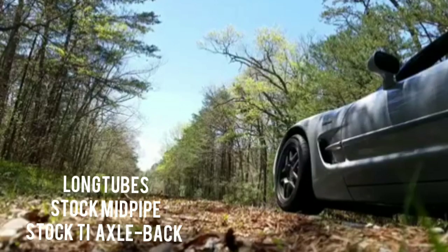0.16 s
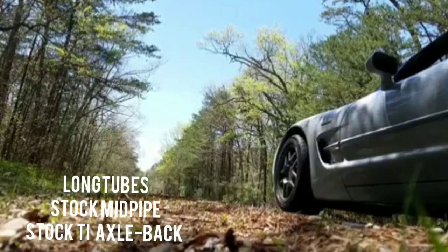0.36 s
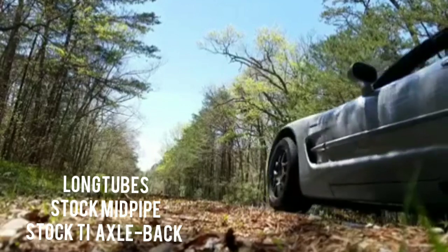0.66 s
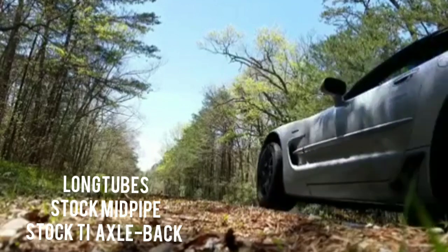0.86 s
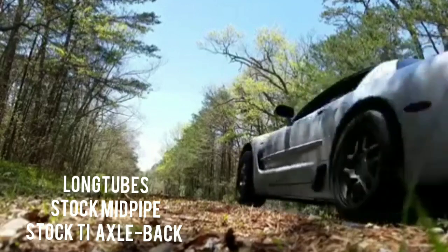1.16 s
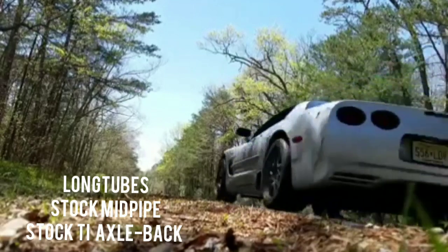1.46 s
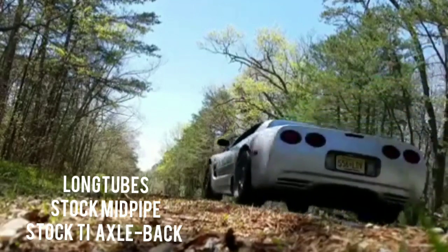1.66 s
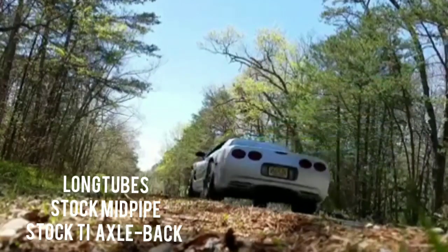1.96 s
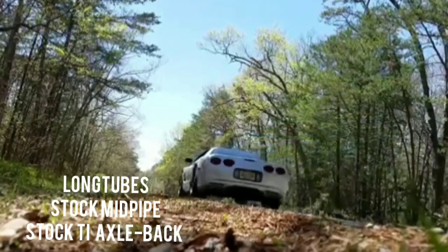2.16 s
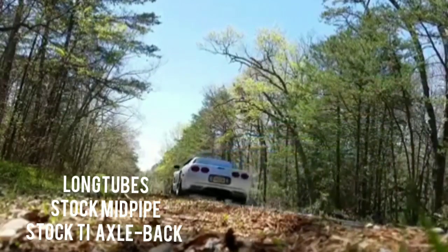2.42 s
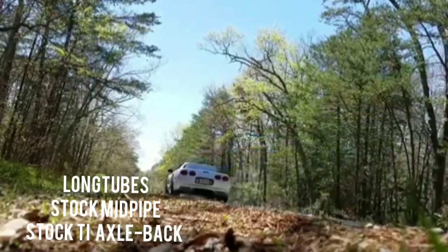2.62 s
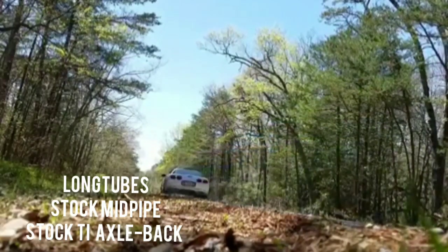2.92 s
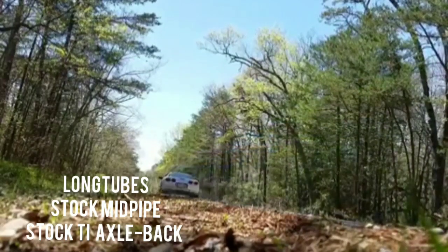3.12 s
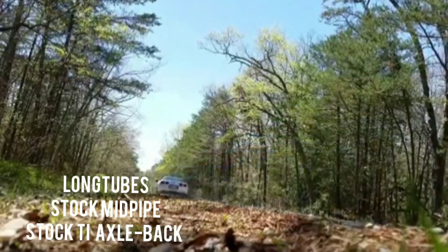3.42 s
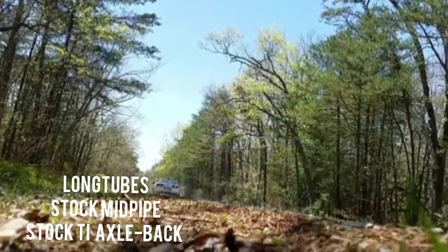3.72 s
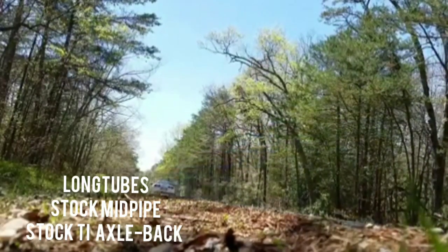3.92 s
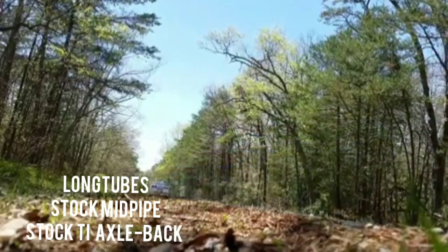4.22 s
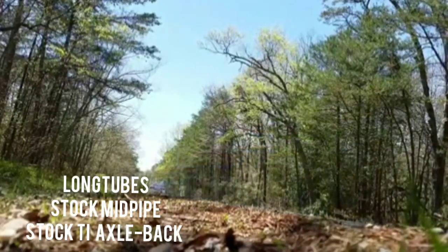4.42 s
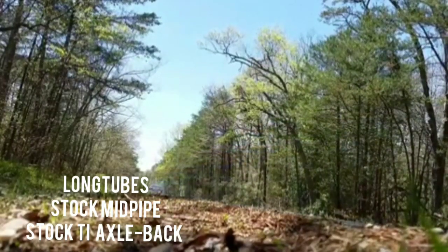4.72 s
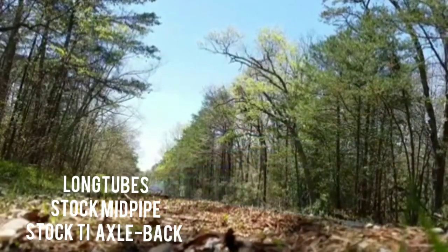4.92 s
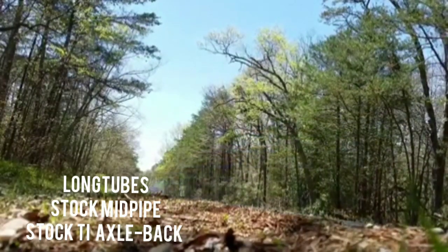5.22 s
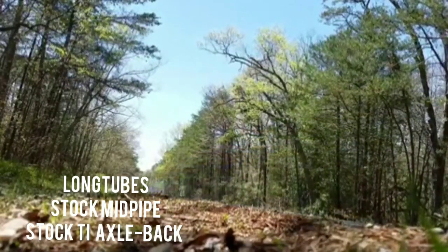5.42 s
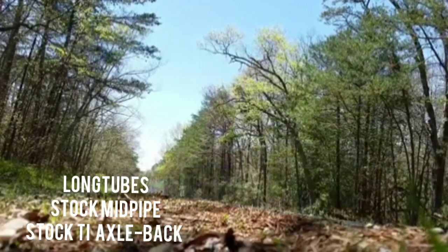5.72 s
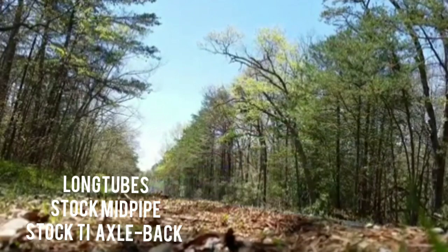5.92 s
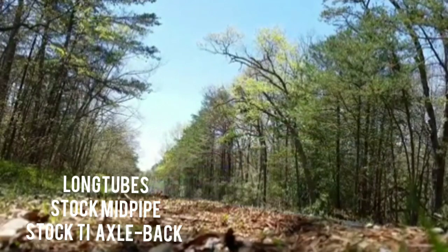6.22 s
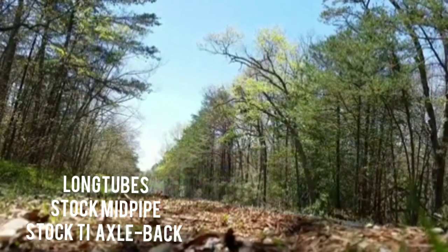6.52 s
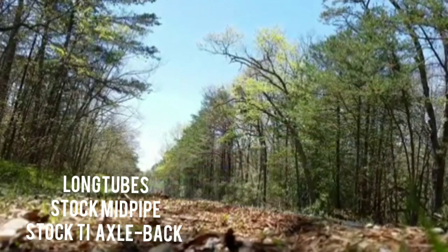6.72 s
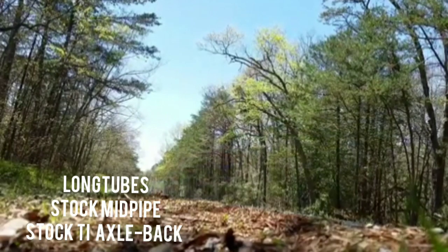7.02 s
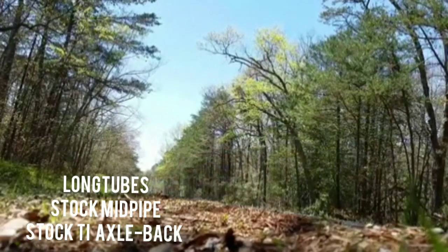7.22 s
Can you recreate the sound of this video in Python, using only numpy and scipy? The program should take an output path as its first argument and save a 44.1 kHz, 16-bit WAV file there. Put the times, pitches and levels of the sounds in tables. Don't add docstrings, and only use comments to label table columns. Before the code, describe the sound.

Outdoors in woodland, stereo microphone on the ground a stride from the car. The engine stutters and grunts off the line with gassy exhaust roar and rustling litter, rasps hard near two seconds, then revs steadily upward. Around four seconds it cuts, barks and chirps its tyres into second gear; past six seconds it shifts again and settles deeper. Band-limited, slightly coarse camera sound with limited peaks.

```python
import sys
import numpy as np
from scipy import signal
from scipy.fft import rfft, irfft, next_fast_len
from scipy.io import wavfile
from scipy.ndimage import uniform_filter1d, minimum_filter1d

SR = 44100
rng = np.random.default_rng(int(sys.argv[2]) if len(sys.argv) > 2 else 0)


def generate_wav(sig):
    pcm = np.round(np.clip(np.atleast_2d(sig).T, -1, 1) * 32767).astype(np.int16)
    wavfile.write(sys.argv[1], SR, pcm)


def ratio_of_db(decibels):
    return 10 ** (np.asarray(decibels, float) / 20)


N = 324727
TIME = np.arange(N) / SR


def unit(x):
    return x / np.sqrt(np.mean(x ** 2) + 1e-20)


def along(points, hz):
    f, v = np.transpose(points)
    return np.interp(np.log(hz + 1), np.log(f + 1), v)


def curves(rows):
    s, *columns = np.transpose(rows)
    return [np.interp(TIME, s, column) for column in columns]


def wobble(rate):
    knots = rng.standard_normal(700)
    return np.interp(TIME * min(rate, 90), np.arange(len(knots)), knots)


def bumps(s, db, length):
    return db * np.exp(-((TIME - s) / length) ** 2)


def peak(s, db, rise_db, fall_db):
    return db - np.where(TIME < s, rise_db * (s - TIME), fall_db * (TIME - s))


def filtered(x, response):
    m = next_fast_len(N + SR)
    return irfft(rfft(x, m) * response(np.fft.rfftfreq(m, 1 / SR)), m)[..., :N]


# (frequency [Hz], likeness [-1 to 1])
LIKENESS = [(60, 0.57), (140, 0.17), (320, 1), (760, 0.75), (1760, 0.52), (4100, -0.04), (9530, 0.34)]


def spread(pair, spectrum):
    def turn(hz):
        return np.arccos(np.clip(along(LIKENESS, hz), -1, 1)) / 2

    mid, side = filtered(pair, lambda hz: spectrum(hz) * [np.cos(turn(hz)), np.sin(turn(hz))])
    return unit(np.array([mid + side, mid - side]))


# (clutch opens [s], clutch bites [s], settling [s])
SHIFTS = [
    (4.095, 4.335, .03),
    (6.22, 6.456, .07),
]


def declutched(t):
    return sum(np.clip(np.minimum(t - out, bite - t) / 0.0095, 0, 1) for out, bite, settle in SHIFTS)


# (time [s], cycle rate [Hz])
GEARED_SPEED = [(0, 11.1), (.43, 15.2), (.8, 13.8), (1.15, 13.4), (1.38, 11.6), (1.56, 16.4), (1.76, 17.5),
                (1.97, 21.4), (2.9, 35.9), (3.4, 43.8), (4.09, 52.3), (4.33, 46.3), (5.07, 42.7), (5.5, 46),
                (6.22, 50.6), (6.46, 38.5), (6.77, 35.8), (7.36, 38.3)]


def revs():
    sag_hz_per_s = 12
    geared, = curves(GEARED_SPEED)
    for out, bite, settle in SHIFTS:
        free = np.interp(out, TIME, geared) - sag_hz_per_s * (np.minimum(TIME, bite) - out)
        hold = (TIME > out) * np.exp(-np.maximum(TIME - bite, 0) / settle)
        geared = geared + hold * (free - geared)
    return geared


# (start [s], end [s], rate [Hz], share of engine speed)
AXLE_HOP = (4.38, 4.95, 10.92, 0.017)


def crank():
    start, end, hop_hz, share = AXLE_HOP
    swing = np.clip((TIME - start) / 0.035, 0, 1) * np.clip((end - TIME) / (end - start), 0, 1) ** 0.6
    cycle_hz = revs() * (1 + share * swing * np.cos(2 * np.pi * hop_hz * (TIME - start) + 3.1))
    return cycle_hz, 2 * np.pi * np.cumsum(cycle_hz) / SR


# (time [s], firing tones [dB], other orders [dB], roar [dB])
ENGINE = [(0, -41.5, -31, -45), (.43, -31.5, -18, -34), (.82, -35.5, -23.5, -32), (1.19, -24, -23, -24),
          (1.39, -21.5, -16.5, -24), (1.56, -28, -18.5, -20), (1.8, -25, -18.5, -20.5),
          (2.0, -20, -11, -21.5), (2.5, -19, -13.5, -32.5), (2.93, -20, -20, -26.5),
          (3.69, -19.5, -13.5, -25.5), (4.09, -17, -16.5, -19.5), (4.33, -19.5, -13, -28.5),
          (5.06, -23.5, -13.5, -26), (5.7, -22, -14, -29), (6.22, -17, -15.5, -21.5),
          (6.6, -19, -15, -26.5), (7.36, -19.5, -14.5, -35.5)]
# (time [s], throttle [0-1])
THROTTLE = [(0, 1), (4.08, 0.63), (4.13, 0.34), (4.35, 0.05), (4.4, 0.85), (6.22, 0.6), (6.27, 0.1),
            (6.46, 0), (6.51, 0.82), (7.4, 0.9)]
# (time [s], scatter [rad per order])
ROUGHNESS = [(0, .008), (.3, .01), (.45, .025), (.75, .02), (1, .012), (1.48, .01), (1.58, .045),
             (2.15, .045), (2.35, .008), (7.4, .008)]
BARK_S = [
    4.14,
    4.37,
    6.29,
    6.5,
]
# (time [s], firing tones [dB], length [s], more on the third tone
# [dB])
FALTERS = [(0.192, 0.5, 0.057, 12.5), (0.305, 4.5, .06, 4.5), (0.546, -8, 0.14, -6), (1.167, 0, .09, -20),
           (1.493, 3.5, 0.047, -6), (1.557, -5, 0.044, 3), (2.01, -2, 0.059, -12), (4.15, 0, .03, -4),
           (6.293, -6.5, 0.026, -1.5), (6.511, -4, 0.021, -3)]
# (start [s], end [s])
LAST_GEAR_S = (6.46, 6.6)
# (start [s], end [s])
FAR_S = (4.1, 6.7)
FAR_DB = [-3, 7.5, 2.5]
DULL_HZ = (776, 1105)
# (frequency [Hz], level [dB])
STANDING_WAVES = [
    [(95, 1), (120, 2), (180, -2.5), (240, -10), (290, 3.5), (350, -7), (405, 4)],
    [(190, 0), (240, -1), (300, 5.5), (350, -6.5), (480, 1.5), (590, -2), (700, 0.5), (820, -6)],
    [(305, 3), (380, -14), (470, 7.5), (560, -6.5), (720, 6), (870, -4), (1000, -25), (1200, -29)],
]
# (order, level [dB])
BANK_THROB = [(2, 0), (3, 5.5), (4, -4), (5, -5.5), (6, 3)]
# (frequency [Hz], level [dB])
LOW_PIPE = [(50, -16.5), (100, -6.5), (150, -2.5), (190, 4), (230, -5.5), (300, 0.5)]
# (order, loaded at high revs [dB], low revs [dB], throttle shut [dB], last gear [dB])
UNEVEN_ORDERS = [(7, -12.5, -18.5, -18.5, -19.5), (9, -12, -20.5, 3, -16.5), (10, 3.5, -9, -4, -16),
                 (11, -2, -3, -11, -9), (12, -5.5, -8, 5, 0.5), (13, -6.5, -3.5, -3, -10.5),
                 (14, 7.5, -4, -6, -1.5), (15, -16, -14.5, 8, -14.5), (17, -9, -19.5, 0.5, -26),
                 (18, -4.5, -5.5, -7, -4.5), (19, -1, -6.5, -15, -2.5), (20, -9, 0.5, -7.5, 4),
                 (21, -14.5, -18.5, -19.5, -17.5), (22, 6.5, 3.5, -13.5, 1.5), (23, -6.5, -12, -1, -16),
                 (25, -2.5, -3, -0.5, -9.5), (26, -3.5, -21, -18, -18), (27, -7.5, 0.5, -8.5, -2.5),
                 (28, 4.5, -11.5, -7, -1), (29, -4, -11, -23.5, -3), (30, 3.5, 0, -2, -1),
                 (31, -8, 2, 0, -10.5), (32, -4.5, 2.5, -5, 3), (34, -7.5, -6.5, -21, -6.5),
                 (36, -1, 0.5, -5.5, -1.5), (38, -16, -4, -4, -4), (40, 1.5, -4, -12, -9),
                 (48, -11.5, -6.5, -6, -2.5)]
# (frequency [Hz], level [dB])
PIPE = [(80, -33), (150, -11.5), (300, -14.5), (400, -5), (520, -5.5), (650, 0), (730, -5.5), (820, 3),
        (950, -6), (1100, -13.5), (1300, -24.5), (1800, -25.5), (2500, -45.5)]


def exhaust(cycle_hz, angle):
    every = 64
    t, speed = TIME[::every], cycle_hz[::every]
    firing_db, other_db = [c[::every] for c in curves(ENGINE)[:2]]
    throttle = curves(THROTTLE)[0][::every]
    rough = curves(ROUGHNESS)[0] + sum(bumps(s, .08, .04) for s in BARK_S)
    shake = rough * wobble(30)
    low = np.clip((46 - speed) / 8, 0, 1)
    last = np.interp(t, LAST_GEAR_S, [0, 1])
    far = np.interp(t, FAR_S, [0, 1])
    shut_db = -5 * declutched(t)
    even_db = -4.5 * np.clip((35 - speed) / 3.9, 0, 1)
    for s, db, length, more_db in FALTERS:
        firing_db = firing_db + bumps(s, db, length)[::every]
    third_db = sum(bumps(s, more_db, length)[::every] for s, db, length, more_db in FALTERS)
    throb_db = -26.5 - 1.5 * np.maximum(39.04 - speed, 0) - 2.5 * np.maximum(t - 3.62, 0)
    throb_db = np.maximum(-61.5, throb_db) + shut_db

    def tone(k, db, drift_db):
        level = np.interp(TIME, t, ratio_of_db(3 + db + drift_db * wobble(9)[::every]))
        start = np.pi * (3 / 2 + 2 * rng.random() * (k % 4 > 0))
        blur = k * rough * wobble(40) * (k > 24 or k % 8 > 0)
        return level * np.sin(k * (angle + shake) + start + blur)

    out = np.zeros(N)
    for k, colour in enumerate(STANDING_WAVES, start=1):
        db = firing_db + shut_db + third_db * (k > 2) + far * FAR_DB[k - 1]
        out += tone(8 * k, db + along(colour, 8 * k * speed), 0.93)
    for order, db in BANK_THROB:
        k = round(order)
        out += tone(k, throb_db + db + along(LOW_PIPE, k * speed), 1.6)
    for order, fast, slow, shut, tall in UNEVEN_ORDERS:
        k = round(order)
        loaded = fast + low * (slow - fast + last * (tall - slow))
        db = other_db - 6.5 + shut + throttle * (loaded - shut) + even_db * (k % 8 > 0)
        db = db + far * np.interp(k * speed, DULL_HZ, [0, -1])
        out += tone(k, db + along(PIPE, k * speed), 2.6)
    return out


# (time [s], level [dB], swell [dB/s], fade [dB/s])
STRAIN = [
    (.45, -29, 67, -6.5),
    (1.8, -14, 42, 6.5),
]
STRAIN_ENDS_S = [
    1.1,
    2.3,
]
BARK_DB = [
    -15,
    -15,
    -17,
    -14.5,
]


def rasp_level():
    cruise = np.minimum(-39.5 + 13 * declutched(TIME), peak(.5, -38.5, 40, 0))
    lug = [peak(*row) - 33 * np.maximum(TIME - end, 0) for row, end in zip(STRAIN, STRAIN_ENDS_S)]
    bark = [peak(s, db, 399, 127) for s, db in zip(BARK_S, BARK_DB)]
    return np.max([cruise, *lug, *bark], axis=0)


CYLINDERS = [3, -2, 0, -3, 2, -2, -1, -3]
# (frequency [Hz], width [Hz], level [dB])
TAILPIPES = [(200, 70, -9.5), (488, 60, -7), (648, 45, -1), (821, 49, 5.5), (1058, 89, -6.5)]


def rasp(angle):
    firing = np.floor(8 * angle / (2 * np.pi)).astype(int)
    blows = -np.diff(firing, prepend=0) * ratio_of_db(CYLINDERS)[firing % 8] * (1 + .8 * rng.standard_normal(N))

    def ring(f):
        return sum((-1) ** k * ratio_of_db(db) * 1j * f * w / (c * c - f * f + 1j * f * w)
                   for k, (c, w, db) in enumerate(TAILPIPES))

    return ratio_of_db(rasp_level()) * unit(filtered(blows, ring))


# (frequency [Hz], width [Hz], level [dB])
CHAMBERS = [(310, 52, 2.5), (422, 120, -13.5), (465, 55, 2), (618, 65, -5), (828, 160, 3), (979, 79, 0.5)]
# (frequency [Hz], density [dB per Hz])
ROAR_BEHIND = [(15, -49), (25, -31), (118, -5.5), (238, -1.5), (281, -9.5), (338, -11.5), (434, -0.5),
               (556, -7.5), (669, -2), (806, -5.5), (1010, -1.5), (1730, -25), (3500, -56.5), (4550, -76.5),
               (7700, -120)]
# (frequency [Hz], density [dB per Hz])
ROAR_BESIDE = [(24, -58), (40, -13.5), (102, -4), (190, -9), (308, -4), (584, -10.5), (671, 1.5),
               (812, -8.5), (1030, -28.5), (1130, -20), (2500, -32), (3250, -63), (5500, -120)]
# (time [s], share of tailpipes in view)
PASSING = [(0, 0.29), (.95, 0.043), (1.4, 0.94), (1.54, 0.93), (7.4, 0.98)]


def roar(angle):
    puff = 1 + .6 * np.cos(8 * angle) + .15 * np.cos(angle * 3)

    def ring(f):
        return 1.0 + sum(ratio_of_db(db) * abs(f * w / (c * c - f * f + 1j * f * w)) ** 2 for c, w, db in CHAMBERS)

    behind, beside = [spread(puff * rng.standard_normal((2, N)), lambda f: ratio_of_db(along(colour, f)) * ring(f))
                      for colour in (ROAR_BEHIND, ROAR_BESIDE)]
    view = np.clip(curves(PASSING)[0], 0, 1)
    level_db = curves(ENGINE)[2] + 5.5 - 1.9 * (1.0 - curves(THROTTLE)[0]) + 3 / 2 * wobble(20)
    return ratio_of_db(level_db) * (view * behind + ratio_of_db(6.0) * (1 - view) * beside)


# (time [s], level [dB], start [Hz], end [Hz], length [s])
CHIRPS = [
    (4.401, -28, 1330, 1457, 0.092),
    (4.429, -25, 1363, 1320, 0.026),
    (4.434, -10, 1216, 1300, 0.034),
    (4.502, -21, 1223, 1282, 0.061),
    (4.533, -29.5, 1220, 1180, 0.028),
    (4.603, -19.5, 1256, 1382, 0.045),
    (4.626, -51, 1330, 1320, 0.037),
    (4.707, -27.5, 1420, 1430, 0.04),
    (4.789, -28.5, 1293, 1366, 0.074),
]


def chirps():
    out, rough = np.zeros(N), wobble(90)
    scrub = unit(filtered(rng.standard_normal(N), lambda f: np.exp(-((f - 1380) / 220) ** 2)))
    for s, db, hz0, hz1, length in CHIRPS:
        near = slice(round((s - .1) * SR), round((s + 0.094) * SR))
        u = (TIME[near] - s) / length
        hz = hz0 + (hz1 - hz0) * np.clip(u + .5, 0, 1) + 95 * rough[near]
        squeal = np.sin(2 * np.pi * np.cumsum(hz) / SR)
        out[near] += ratio_of_db(db + 4.0) * np.exp(-6 * u * u) * (squeal + 0.45 * scrub[near])
    return out


# (time [s], level [dB])
STIRRING = [(0, -39.5), (.28, -41), (.5, -35), (.64, -38), (.84, -33.5), (1.02, -33.5), (1.25, -37.5),
            (1.5, -36.5), (1.75, -39), (2.3, -45.5), (2.8, -42.5), (3.42, -35.5), (4.37, -41.5), (4.4, -43),
            (6.56, -58), (6.66, -65.5), (7.36, -65.5)]
# (time [s], level over the hiss [dB], length [s])
SNAPS = [(0.481, 8, 0.0068), (.542, 1.5, 0.0066), (0.685, 4.5, 0.0096), (0.73, 3, 0.0029),
         (0.798, 6, 0.0032), (0.864, 5, .006), (1.118, 4, .006), (1.149, 7.5, .006), (1.182, 5.5, 0.0034),
         (1.29, 4, 0.0034), (1.342, 12.5, 0.0015), (1.354, -2, .003), (1.373, 5.5, 0.0023),
         (1.384, 9.5, .004), (1.683, 12, 0.0022), (2.251, 9.5, 0.0041), (2.481, 0, 0.0027),
         (2.572, 2, 0.0028), (4.406, -2, 0.0023)]
# (frequency [Hz], density [dB per Hz])
RUSTLE = [(1470, -15.5), (2500, -4), (3260, -7.5), (4590, -7.5), (4980, -7), (5400, -5.5), (6930, -6.5),
          (8240, -1), (9470, -9), (9980, -22), (13000, -59), (22000, -120)]


def leaves():
    hiss_db = curves(STIRRING)[0] + sum(bumps(*row) for row in SNAPS)
    crackle = 1.8 * (rng.random(N) < .003) * rng.exponential(1, N)
    grains = rng.standard_normal((2, N)) * (1 + crackle)
    clumps = ratio_of_db(1.1 * wobble(40) + .7 * wobble(12))
    return ratio_of_db(hiss_db + 4.0) * unit(clumps * spread(grains, lambda f: ratio_of_db(along(RUSTLE, f))))


# (time [s], level [dB], swell [dB/s], fade [dB/s])
SCRUB = [
    (0.489, -33.5, 37, 8),
    (1.66, -34, 54, 25.5),
    (2.15, -37, 12.5, 11),
    (3.602, -37, 10.5, 3),
    (4.4, -34, 305, 6),
]
# (frequency [Hz], density [dB per Hz])
TREAD = [(710, -37.5), (1200, -3), (1410, -5), (1910, -8.5), (2440, -16.5), (3010, -22.5), (5000, -31.5),
         (6500, -46), (11000, -120)]


def tread():
    level_db = np.max([peak(*row) for row in SCRUB], axis=0) - 4 * np.clip((TIME - 7.2) / 0.088, 0, 1)
    rush = spread(rng.standard_normal((2, N)), lambda f: ratio_of_db(along(TREAD, f)))
    return ratio_of_db(level_db + 5.5 + 1.6 * wobble(60)) * rush


# (frequency [Hz], time to fall 60 dB [s])
TREES = [(100, 0.34), (700, 0.53), (3000, 0.38)]


def trees(x):
    hz, t, z = signal.stft(rng.standard_normal((2, SR // 2)), SR, nperseg=256)
    tail = signal.istft(z * ratio_of_db(-60 * t / along(TREES, hz)[:, None]), SR, nperseg=256)[1]
    delayed = np.pad(x, (700, 0))[None]
    return signal.fftconvolve(delayed, tail / np.linalg.norm(tail[0]), axes=1)[:, :N]


def breeze():
    level_db = -56.5 + bumps(3.9, 17.0, 0.76) - bumps(2.2, 7.2, 0.53) + 2.9 * wobble(4)
    rumble = filtered(rng.standard_normal((2, N)), lambda f: f * f / (35 ** 4 + f ** 4))
    return ratio_of_db(level_db) * unit(rumble)


# (time [s], level [dB], length [s])
IGNITION_GAPS = [
    (4.104, -10, .022),
    (4.345, -5, .01),
    (6.232, -9, .02),
    (6.28, -3, .035),
    (6.466, -9, .011),
]
# (time [s], left over right [dB])
PAN = [(0.0, 1.5), (0.57, 1.5), (1.41, 2), (1.74, 0), (3.65, 2.5), (4.35, 0.5), (5.53, 0), (6.46, 1),
       (7.36, 0.5)]
# (time [s], left lag [samples])
LEFT_LAG = [(0, 12), (1.2, 15), (1.8, 6), (2.3, 0), (7.4, 0)]


def scene():
    cycle_hz, angle = crank()
    gaps = ratio_of_db(sum(bumps(*row) for row in IGNITION_GAPS))
    car = (exhaust(cycle_hz, angle) + rasp(angle)) * gaps + chirps()
    side, lag = (curves(PAN)[0] - 1.4) / 2, curves(LEFT_LAG)[0] / SR / 2
    heard = (car + .22 * trees(car) + roar(angle) * gaps) * ratio_of_db([side, -side])
    placed = np.array([np.interp(TIME - lag, TIME, heard[0]), np.interp(TIME + lag, TIME, heard[1])])
    litter = leaves() + tread() + breeze()
    late = np.arange(N) - np.round(1.5 * lag * SR).astype(int)
    litter[0] = litter[0, np.clip(late, 0, N - 1)]
    return placed + litter


# (frequency [Hz], step over band rms [dB])
COARSENESS = [(500, -24), (850, -14), (1100, -9), (1600, -2), (2500, 5), (3500, 7), (5000, 7.5), (8000, 7),
              (9700, 8)]
# (time [s], coarser by [dB])
STARVED = [(1.45, 0), (1.55, 4), (1.9, 4), (2, 0), (2.8, 0), (2.9, 2.5), (4.3, 2.5), (4.45, 0)]
# (time [s], frequency [Hz])
CEILING = [(0, 9650), (4.37, 9600), (4.39, 9050), (7.4, 8800)]


def camera_bands(x, size=1024, count=16):
    n, turn = np.arange(2 * size) + .5, np.array([[1, 1], [1, -1]]) / np.sqrt(2)
    window = np.sin(np.pi * n / (2 * size)) * np.sqrt(2 / size)
    basis = window * np.cos(np.pi / size * np.outer(n[:size], n + size / 2))
    halves = np.pad(turn @ x, ((0, 0), (size, 2 * size - N % size))).reshape(2, -1, size)
    bins = np.concatenate([halves[:, :-1], halves[:, 1:]], 2) @ basis.T
    bins = bins.reshape(2, -1, size // count, count)
    power = uniform_filter1d((bins ** 2).mean((0, 3)), 3, 1)
    rms = np.sqrt(abs(uniform_filter1d(power, 3, 0))) + 1e-9
    drift = unit(uniform_filter1d(rng.standard_normal(rms.shape), 3, 0))
    hz = (np.arange(size // count) + .5) * count * SR / 2 / size
    s = np.arange(len(rms))[:, None] * size / SR
    step_db = along(COARSENESS, hz) + 2.6 * drift
    step_db = step_db + np.interp(s, *np.transpose(STARVED)) * (abs(hz - 3800) < 1100)
    step_db = step_db + 9 * (s < 1.2) * (abs(hz - 1050) < 200)
    step = (rms * ratio_of_db(step_db))[..., None]
    kept = (hz + 250 * drift[:, :1] * (s < 4.38) < np.interp(s, *np.transpose(CEILING)))[..., None]
    rounded = kept * np.sign(bins) * np.floor(abs(bins) / step + .4) * step
    frames = rounded.reshape(2, -1, size) @ basis
    return turn @ (frames[:, :-1, size:] + frames[:, 1:, :size]).reshape(2, -1)[:, :N]


# (frequency [Hz], left over right [dB])
LEAN = [(60, 5.5), (140, 5.5), (320, 1), (760, 1.5), (1760, 0.5), (4100, -1), (9530, 2)]
# (frequency [Hz], left lead [rad])
LEAD = [(50, -1.1), (110, -.8), (260, -.4), (450, -.3), (800, -.4), (1300, -.5), (2500, 0)]


def band_limit(x):
    return signal.sosfilt(signal.butter(12, 10130, fs=SR, output="sos"), x)


def record(dry):
    half = np.array([[.5], [-.5]])
    x = filtered(dry, lambda hz: ratio_of_db(half * along(LEAN, hz)) * np.exp(1j * half * along(LEAD, hz)))
    needed = np.minimum(1, .9 / (abs(x).max(0) + 1e-9))
    x = x * uniform_filter1d(minimum_filter1d(needed, size=301), size=301)
    mix = camera_bands(x)
    return band_limit(mix)


dry = scene()
out = record(dry)
generate_wav(out)
```